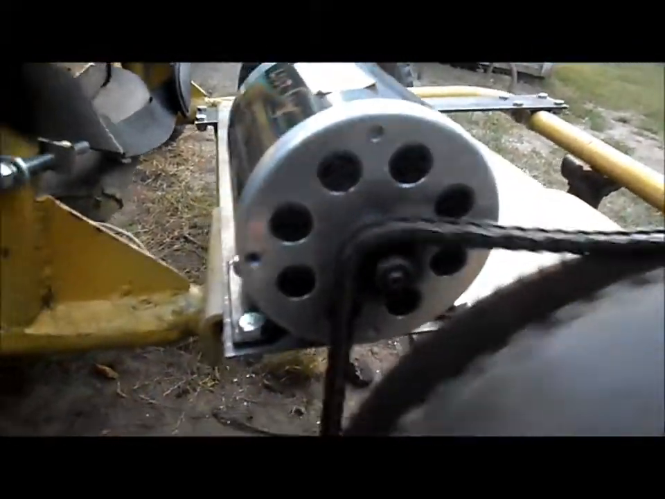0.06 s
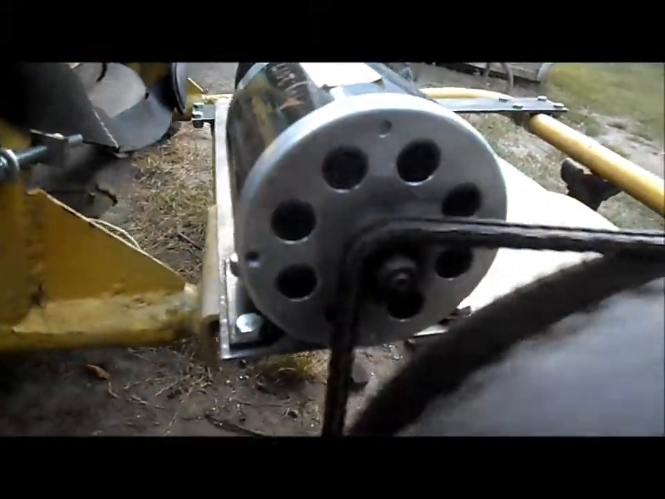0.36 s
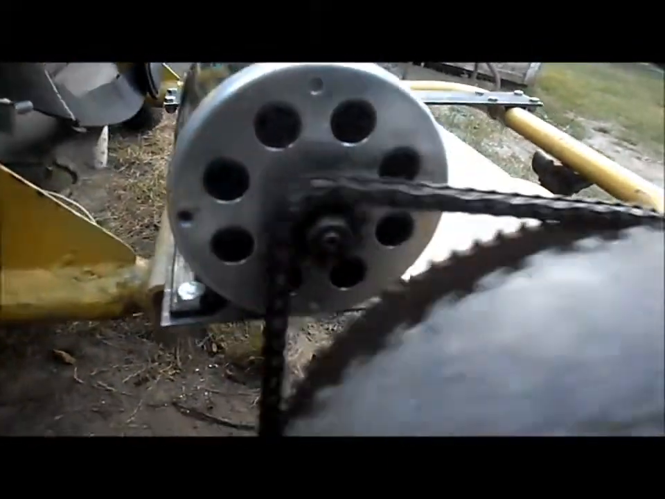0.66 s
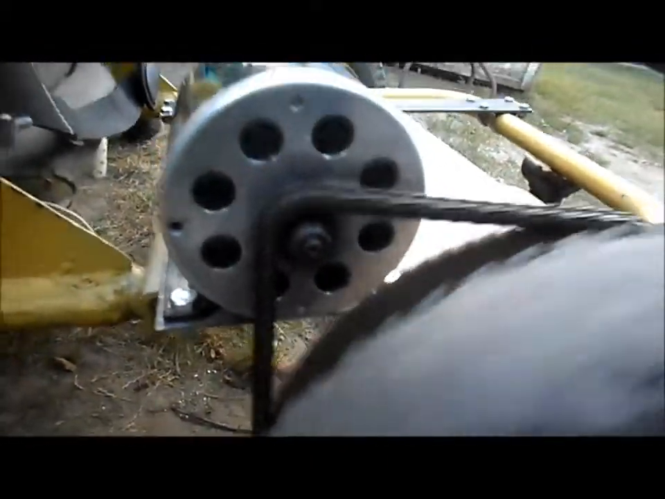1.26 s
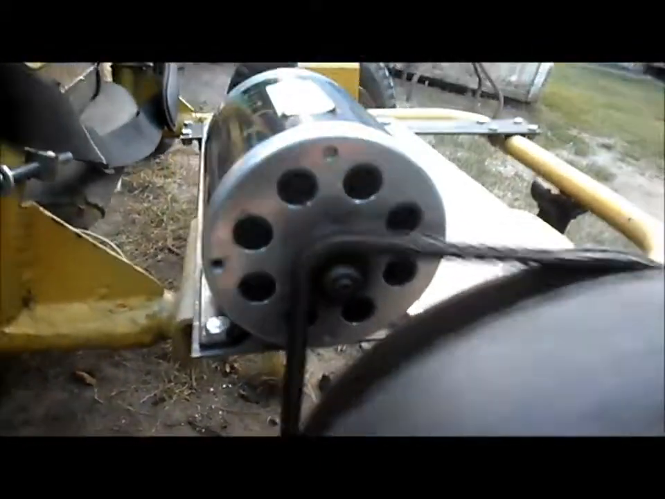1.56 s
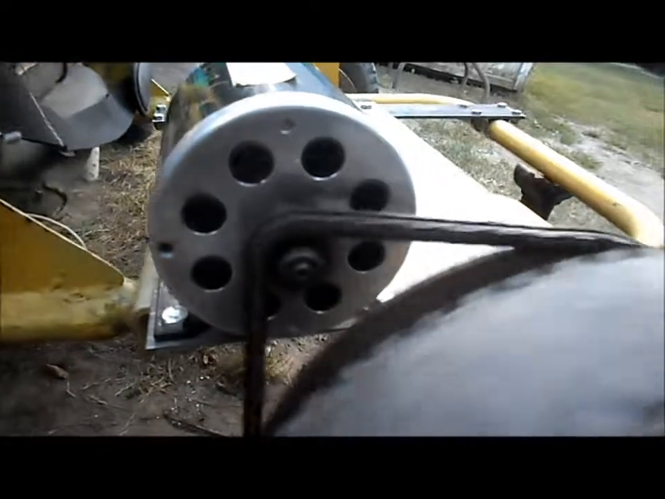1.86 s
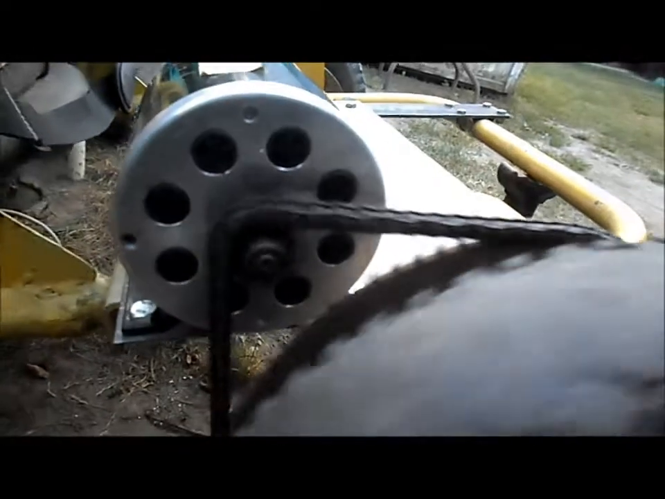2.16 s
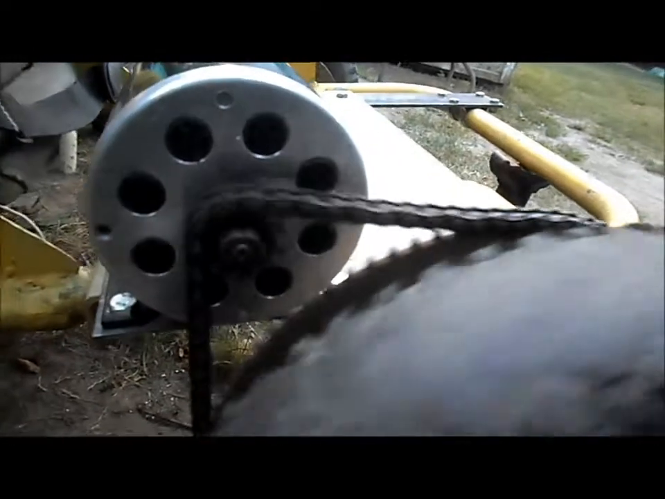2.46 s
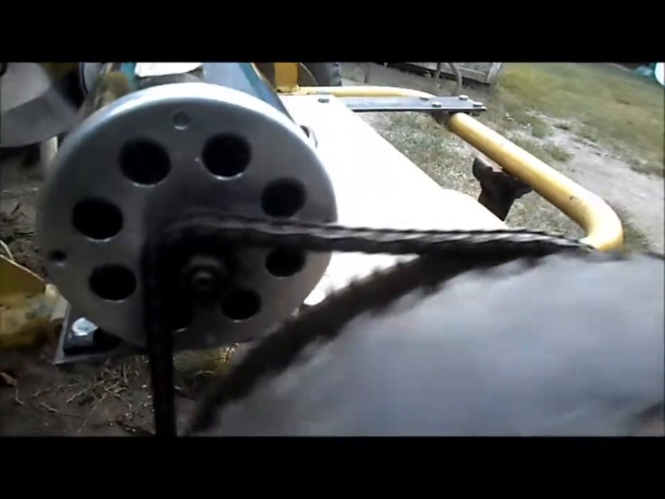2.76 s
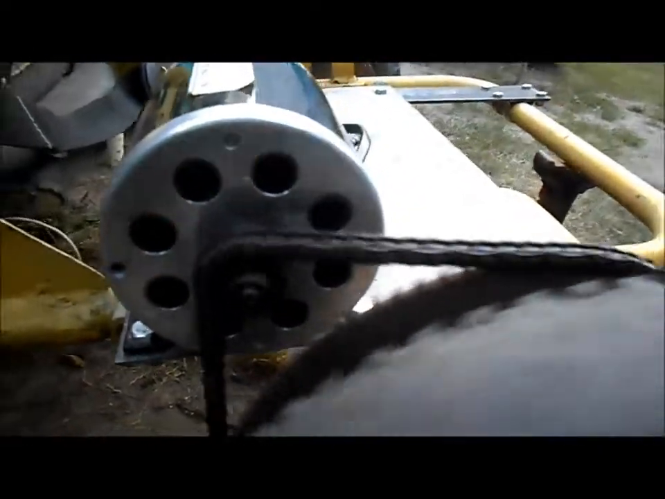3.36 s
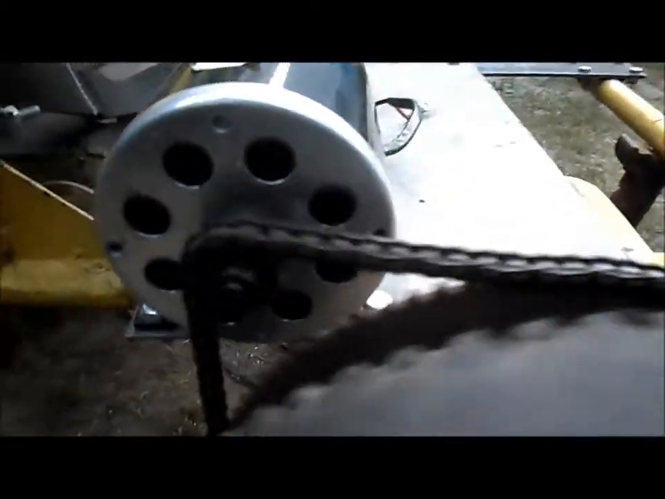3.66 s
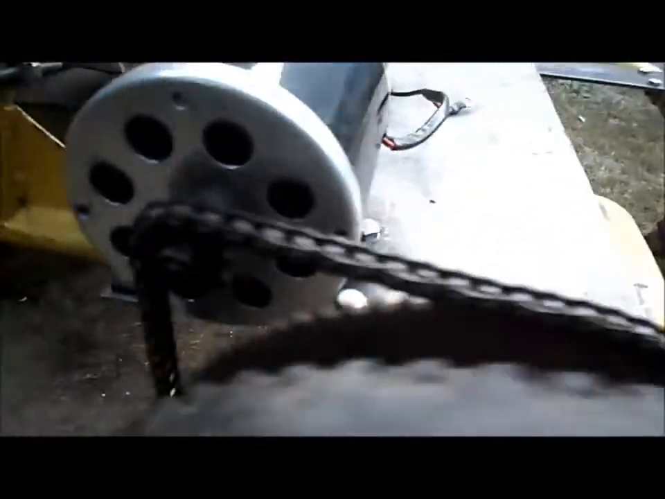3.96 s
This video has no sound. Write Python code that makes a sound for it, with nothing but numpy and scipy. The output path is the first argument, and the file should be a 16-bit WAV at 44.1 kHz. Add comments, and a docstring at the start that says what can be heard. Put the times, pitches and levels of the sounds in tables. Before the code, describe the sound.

A slack roller chain rattles and clacks over go-kart sprockets, close up, its steel ringing. It speeds up to peaks near 0.4, 2 and 3.3 seconds, coasting down after each. Brief squeaks come at 0.3 and 1.8 seconds, two dull knocks just before 1, and a short chassis groan at 2. Sprocket pings grow stronger from 2.5 seconds. A low drone follows the speed, over wind rumble.

```python
"""A slack roller chain runs over the sprockets of a go-kart, speeding up and coasting down three times.
Its links clack on the teeth, setting the steel and the large sprocket's plate ringing.
Underneath, the rollers rattle, the frame drones, the meshing teeth hum and wind rumbles on the microphone.
The chain squeaks twice, knocks twice and chatters near each top speed; the frame groans once."""
import sys
import numpy as np
from scipy import signal
from scipy.fft import rfft, irfft, next_fast_len
from scipy.io import wavfile

SR = 44100
rng = np.random.default_rng(int(sys.argv[2]) if len(sys.argv) > 2 else 0)


def dump_mix(stems):
    """Bounce the given channels to the path in sys.argv[1] as a 16-bit WAV at rate SR."""
    frames = np.atleast_2d(stems).T  # one column per channel
    limited = np.clip(frames, -1, 1)  # hard clip at full scale
    pcm = np.round(limited * 32767).astype(np.int16)
    wavfile.write(sys.argv[1], SR, pcm)


N = 176400

# pace of the chain: (t/s, rate/(links per second))
CHAIN_SPEED = [(0, 62), (.35, 87), (.55, 82.6), (.8, 56), (1.05, 39), (1.3, 33.5), (1.45, 41), (1.62, 87),
               (2.0, 96), (2.32, 70), (2.85, 45.5), (3.05, 79.6), (3.27, 95), (3.62, 66), (4, 52.6)]
# fader of the rollers' fine rattle: (t/s, level/dB)
RATTLE_LEVEL = [(0, -50), (.07, -43.5), (.6, -46.5), (.8, -51.5), (1.45, -57.5), (1.66, -44), (1.8, -40),
                (2.0, -42), (2.25, -53), (2.95, -51.5), (3.17, -48), (3.35, -46.5), (3.7, -53.5),
                (4, -48.5)]
# EQ of that rattle: (f/Hz, level/dB)
RATTLE_EQ = [(700, -12.5), (1450, -0.5), (2000, 7), (3200, 0), (5000, 1.5), (6200, -18), (7800, -5),
             (10500, -4)]
# short-ringing modes of the chain's steel: (f/Hz, width/Hz, level/dB)
STEEL_MODES = [(1299, 68, -2), (2070, 200, -3), (2707, 94, -6.5), (2964, 79, -5.5), (3520, 240, -14),
               (3920, 78, 1), (6290, 580, -6), (7530, 310, -10.5), (8680, 840, -6), (9390, 120, -2.5),
               (10030, 143, -7.5)]
# fader of the frame's drone: (t/s, level/dB)
DRONE_LEVEL = [(0, -49.5), (.3, -44), (.74, -42), (1.05, -53), (1.42, -60.5), (1.72, -39), (1.82, -44),
               (2.02, -32), (2.12, -37.5), (2.35, -46.5), (2.6, -54.5), (2.98, -52), (3.22, -32.5),
               (3.45, -44), (4, -52.5)]
# resonances of the frame: (f/Hz, width/Hz, level/dB)
FRAME_MODES = [(272.6, 13, 10), (353.6, 25.6, 1), (402, 74, -3.5), (528.4, 42, -0.5), (586, 35, 1),
               (686, 70, 0.5), (855, 130, -4.5), (1075, 300, -10), (1280, 60, -6.5), (1850, 270, -6.5)]
# EQ of the drive's low rumble: (f/Hz, level/dB)
RUMBLE_EQ = [(75, -10.5), (98, 1.5), (117, 4.5), (140, -6), (165, 1), (200, 1), (260, -8.5), (600, -31)]
# EQ of the wind on the microphone: (f/Hz, level/dB)
WIND_EQ = [(29, -2.5), (115, 0), (200, -18), (1000, -26.5), (10000, -49)]
# accents, where a link lands hard on a tooth: (t/s, level/dB)
HARD_HITS = [(0.038, -15), (0.057, -12), (0.0721, -13), (0.0884, -15), (0.1017, -12.5), (0.1289, -11),
             (0.1538, -15), (0.1813, -14.5), (0.1923, -15), (0.2031, -11.5), (0.2474, -18.5), (0.316, -15),
             (0.3478, -12), (0.396, -16.5), (0.434, -13), (0.4435, -16.5), (0.4557, -11.5), (0.4803, -12),
             (0.5044, -18), (0.518, -15.5), (0.5302, -12), (0.5437, -11.5), (0.555, -10), (0.5702, -17),
             (0.5825, -13.5), (0.6105, -13), (0.626, -15.5), (0.6398, -16), (0.655, -15), (0.669, -10.5),
             (0.6839, -13), (0.6989, -20), (0.715, -18.5), (0.731, -18.5), (0.7492, -19), (0.764, -15.5),
             (0.7815, -13.5), (0.8006, -12), (0.8358, -20), (0.8556, -16), (0.8749, -12.5), (0.8945, -15.5),
             (0.9155, -12), (0.94, -15.5), (0.9592, -15), (0.9863, -19.5), (1.0068, -20.5), (1.034, -23.5),
             (1.0576, -22.5), (1.0863, -19), (1.1111, -17), (1.1432, -20.5), (1.1712, -18), (1.2081, -17),
             (1.2393, -16), (1.3132, -16.1), (1.3544, -24), (1.377, -19), (1.4067, -24.5), (1.4298, -27),
             (1.4564, -16.5), (1.474, -13), (1.4971, -16), (1.511, -15), (1.572, -18.5), (1.5872, -21.5),
             (1.5984, -11.5), (1.6228, -19), (1.6442, -17.5), (1.6867, -21), (1.6978, -16.5), (1.7073, -15),
             (1.7254, -17), (1.7422, -13.5), (1.7786, -22), (1.7986, -15), (1.807, -15.5), (1.8179, -16),
             (1.8236, -13), (1.8365, -19), (1.872, -10.5), (1.882, -17), (1.8937, -8.5), (1.901, -16),
             (1.921, -17), (1.932, -15), (1.9528, -10.5), (1.9728, -10.5), (1.982, -14), (1.9934, -9),
             (2.0032, -14), (2.0129, -9), (2.0243, -12), (2.0345, -8.3), (2.047, -12), (2.0568, -11),
             (2.0784, -7.5), (2.09, -13), (2.101, -13.5), (2.1128, -12.5), (2.1243, -12), (2.1361, -15),
             (2.1476, -7), (2.1607, -10.5), (2.173, -14.5), (2.196, -16), (2.21, -13.5), (2.2226, -10.5),
             (2.2356, -13.5), (2.2482, -10), (2.264, -6.5), (2.2742, -10), (2.3027, -9.5), (2.331, -15.5),
             (2.3468, -18.5), (2.3576, -11.5), (2.3767, -20), (2.3871, -9.5), (2.406, -16.5), (2.4162, -9),
             (2.4467, -11.5), (2.478, -12.5), (2.51, -15), (2.5309, -20.5), (2.5422, -12.5), (2.5653, -19),
             (2.5759, -17), (2.6071, -16.5), (2.6438, -15.5), (2.6784, -15), (2.7153, -13), (2.753, -12.5),
             (2.7963, -21.5), (2.832, -16.5), (2.8547, -19.5), (2.8749, -15.5), (2.9103, -18.5),
             (2.9427, -13), (3.005, -14), (3.0217, -15), (3.0343, -9.5), (3.0473, -18), (3.0603, -15.5),
             (3.072, -14), (3.0849, -15.5), (3.097, -16.5), (3.119, -16), (3.1313, -9), (3.1438, -13),
             (3.1537, -8), (3.1654, -9), (3.1759, -7.5), (3.1867, -11), (3.1976, -10.5), (3.2092, -18),
             (3.2186, -11.5), (3.2304, -16), (3.2392, -10), (3.251, -12), (3.2596, -9.5), (3.2718, -12.5),
             (3.2811, -9), (3.2935, -12), (3.3033, -9.5), (3.316, -13), (3.3263, -11.5), (3.3392, -17),
             (3.3489, -9.5), (3.3615, -15), (3.372, -12), (3.3847, -18), (3.3955, -11), (3.408, -12.9),
             (3.4196, -8.5), (3.4334, -11), (3.4448, -9.5), (3.457, -21), (3.4696, -17), (3.483, -15.5),
             (3.4965, -10.5), (3.5088, -11), (3.5221, -11.5), (3.5379, -10), (3.548, -8.5), (3.5766, -11.5),
             (3.6318, -13.5), (3.6521, -20), (3.6608, -11.5), (3.6811, -24), (3.69, -9), (3.738, -18.5),
             (3.752, -16), (3.7692, -21.9), (3.784, -15), (3.8174, -17.5), (3.8475, -15.5), (3.8828, -18.5),
             (3.9163, -23.5), (3.95, -14), (3.9866, -18.5)]
# EQ of a clack's attack: (f/Hz, level/dB)
TICK_EQ = [(1500, -17.5), (2300, -14.5), (3400, -1.5), (5300, 1.2), (5900, 4), (6200, 10.5), (6600, 3.5),
           (7200, -1), (10300, -5)]
# long, clear modes of the sprockets: (f/Hz, level/dB)
CHIME_MODES = [(1665, -1.5), (1741, -4), (2008, -3), (2735, -5), (3933, -7), (7381, -10.5), (9226, -2)]
# send from the hits to the large sprocket's plate: (t/s, level/dB)
PLATE_SEND = [(.5, 2), (1.4, 4.5), (2.3, 4.5), (2.55, 15.5), (3.35, 7.5), (3.6, 14), (4, 21.5)]
# two close modes of that plate: (f/Hz, width/Hz, level/dB)
PLATE_MODES = [(2310, 31, 3.5), (2414, 27, 4)]
# crests of the chain's squeaks: (t/s, level/dB)
SQUEAK_PEAKS = [(.333, -43), (1.762, -42)]
# crests of the links' chatter: (t/s, level/dB)
CHATTER_PEAKS = [(.56, -43), (1.96, -44), (3.21, -46)]
# dull knocks of the slack chain: (t/s, level/dB)
SLACK_KNOCKS = [(.728, -27.5), (.946, -30.5)]
# fader of the frame's groan: (t/s, level/dB)
GROAN_LEVEL = [(1.86, -46), (1.98, -39.5), (2.04, -33), (2.075, -73)]


def from_db(db):
    """Decibels to gain."""
    return 10 ** (np.asarray(db) / 20)


def rms_one(x):
    """Scale to unit rms."""
    return x / np.sqrt(np.mean(x ** 2) + 1e-20)


def automation(rows):
    """Straight ramps through (t/s, value) points, at every sample."""
    return np.interp(np.arange(N) / SR, *np.transpose(rows))


def swells(peaks, fade_s):
    """A bell-shaped envelope around each (t/s, level/dB), down to 1/e at fade_s either side."""
    t = np.arange(N) / SR
    return sum(from_db(db) * np.exp(-((t - s) / fade_s) ** 2) for s, db in peaks)


def equalise(x, points):
    """Minimum-phase EQ through (f/Hz, level/dB) points: nothing rings ahead of an attack."""
    size = 2 * next_fast_len(N)
    hz, db = np.transpose(points)
    grid_hz = np.maximum(np.arange(size // 2 + 1) * SR / size, 1)
    gain = from_db(np.interp(np.log(grid_hz), np.log(hz), db))
    cepstrum = irfft(np.log(gain))
    cepstrum[1:size // 2] *= 2
    cepstrum[size // 2 + 1:] = 0
    return irfft(rfft(x, size) * np.exp(rfft(cepstrum)))[:N]


def resonate(x, hz, width_hz):
    """One resonance, unity gain at its peak."""
    r = np.exp(-np.pi * width_hz / SR)
    feedback = [1, -2 * r * np.cos(2 * np.pi * hz / SR), r * r]
    return signal.lfilter(np.array([1, 0, -1]) * (1 - r * r) / 2, feedback, x + 1e-18)


def band(x, hz, width_hz):
    """The same resonance twice in series, for steeper skirts."""
    return resonate(resonate(x, hz, width_hz), hz, width_hz)


def body(x, modes):
    """Parallel resonances with alternating polarity."""
    return sum((-1) ** k * from_db(db) * resonate(x, hz, width)
               for k, (hz, width, db) in enumerate(modes))


def scatter(hits, t60_s):
    """Every hit becomes a dying burst of noise of the same energy."""
    decay = from_db(-60 / (t60_s * SR)) ** 2
    energy = signal.lfilter([1 - decay], [1, -decay], hits ** 2 + 1e-18)
    return np.sqrt(energy) * rng.standard_normal(N)


def roller_grains(per_link=40, spread_db=5.5):
    """Tiny contacts of rollers and pins, denser as the chain speeds up."""
    contacts = rng.random(N) < per_link * automation(CHAIN_SPEED) / SR
    polarity = rng.choice([-1, 1], N)
    strength = from_db(spread_db * np.minimum(rng.exponential(1, N), 4))
    return contacts * polarity * strength


def roller_rattle(grains):
    """The rollers' contacts make a fine grit, partly ringing in the steel."""
    grit = from_db(0.5) * rms_one(equalise(grains, RATTLE_EQ))
    ring = from_db(-2) * rms_one(body(grains, STEEL_MODES))
    return from_db(automation(RATTLE_LEVEL)) * (grit + ring)


def follow_drone(mean_db, depth):
    """A gain that rides the drone's fader: depth times its swing in dB, around mean_db."""
    drone_db = automation(DRONE_LEVEL)
    return from_db(mean_db + depth * (drone_db - drone_db.mean()))


def frame_drone(trim_db=-1):
    """The running drive shakes the frame: a drone in its resonances over a low rumble."""
    drone = rms_one(body(rng.standard_normal(N), FRAME_MODES))
    drone *= from_db(automation(DRONE_LEVEL) + trim_db)
    rumble = rms_one(equalise(rng.standard_normal(N), RUMBLE_EQ))
    return drone + follow_drone(mean_db=-41, depth=0.58) * rumble


def mesh_hum(waver_depth=0.0118):
    """Meshing teeth hum on harmonics of the link rate; each swells as it crosses a frame resonance."""
    waver = signal.resample(rng.standard_normal(160), N)
    link_hz = automation(CHAIN_SPEED) * (1 + waver_depth * waver)
    phase = 2 * np.pi * np.cumsum(link_hz) / SR
    harmonics = sum(np.sin(k * phase + rng.uniform(0, 2 * np.pi)) for k in range(2, 8))
    hum = body(harmonics, FRAME_MODES) + 0.5 * np.sin(2 * phase)
    return follow_drone(mean_db=-54.5, depth=1.3) * rms_one(hum)


def wind(level_db=-40, low_cut_hz=18):
    """Wind buffets the microphone: a bed of lumpy low noise."""
    air = equalise(rng.standard_normal(N), WIND_EQ)
    low_cut = signal.butter(2, low_cut_hz, "high", fs=SR, output="sos")
    return from_db(level_db) * rms_one(signal.sosfilt(low_cut, air))


def link_hits(soft_db=-28.5, spread_db=4, jitter_links=0.063):
    """Links land on teeth: hard accents, with soft hits between them at the pace of the chain."""
    times, hard_db = np.transpose(HARD_HITS)
    hard_at = np.sort(np.clip((times * SR).astype(int), 0, N - 1))
    speed = automation(CHAIN_SPEED)
    links_passed = np.cumsum(speed) / SR
    hits = np.zeros(N)
    for start, end in zip(links_passed[hard_at], links_passed[hard_at[1:]]):
        steps = max(int(round(end - start)), 1)
        links = np.linspace(start, end, steps + 1)[1:-1]
        timing, force = rng.standard_normal((2, 20))[:, :len(links)]
        soft_at = np.searchsorted(links_passed, links + jitter_links * timing)
        hits[np.minimum(soft_at, N - 1)] = from_db(soft_db + spread_db * force)
    hits *= (speed / speed.mean()) ** 1.5  # only the soft hits grow with speed
    hits[hard_at] = from_db(hard_db)
    return hits


def clacks(hits, variation=0.38, chime_q=210):
    """Each hit is a hard tick, never quite the same, a short ring of steel and a faint sprocket chime."""
    tick = equalise(hits + variation * scatter(hits, t60_s=0.009), TICK_EQ)
    shake = scatter(hits, t60_s=0.047)
    ring = body(shake, STEEL_MODES)
    chime = body(shake, [(hz, hz / chime_q, db) for hz, db in CHIME_MODES])
    return from_db(9) * tick + from_db(11.5) * ring + from_db(19.5) * chime


def plate_ping(hits, delay_s=0.002696, hz=2402, width_hz=213):
    """Each hit reaches the large sprocket a moment later: its plate pings, and two close modes beat."""
    send = hits * from_db(automation(PLATE_SEND))
    samples = np.arange(N)
    delayed = np.interp(samples - delay_s * SR, samples, send, left=0)
    shake = resonate(delayed, hz, width_hz)
    ping = resonate(shake, hz, width_hz)
    tail = sum(from_db(db) * resonate(shake, mode_hz, width) for mode_hz, width, db in PLATE_MODES)
    return ping + tail


def squeaks():
    """Steel rubs on steel: brief, bright chirps in one narrow resonance."""
    rub = band(rng.standard_normal(N), hz=4720, width_hz=240)
    return swells(SQUEAK_PEAKS, fade_s=0.009) * rms_one(rub)


def link_chatter(grains):
    """The links chatter in a broad midrange swell near each top speed."""
    mids = band(grains, hz=1965, width_hz=1700)
    return swells(CHATTER_PEAKS, fade_s=0.13) * rms_one(mids)


def slack_knocks():
    """The slack chain knocks dully: a couple of cycles of a heavily damped resonance."""
    pushes = np.zeros(N)
    for s, db in SLACK_KNOCKS:
        pushes[int(s * SR)] = from_db(db)
    thuds = band(pushes, hz=700, width_hz=540)
    return thuds * pushes.max() / np.abs(thuds).max()


def frame_groan():
    """One resonance of the frame swells at top speed and stops as the pull ends."""
    tone = band(rng.standard_normal(N), hz=590, width_hz=55)
    compressed = tone / np.sqrt(np.abs(signal.hilbert(tone)) + 1e-12)  # 2:1, evens out the flutter
    t = np.arange(N) / SR
    gate = (t > GROAN_LEVEL[0][0]) & (t < GROAN_LEVEL[-1][0])
    return from_db(automation(GROAN_LEVEL)) * gate * rms_one(compressed)


def scene():
    """Chain, sprockets, frame and wind, mixed in mono at one close microphone."""
    hits = link_hits()
    impacts = clacks(hits) + plate_ping(hits)
    grains = roller_grains()
    texture = roller_rattle(grains) + squeaks() + link_chatter(grains)
    frame = frame_drone() + mesh_hum() + frame_groan()
    return (impacts + texture + frame + slack_knocks() + wind())[None]


def record(dry):
    """A steep high cut at 10.5 kHz takes the air off the mix."""
    high_cut = signal.firwin(91, 10500, window=("kaiser", 6), fs=SR)
    return signal.fftconvolve(dry, high_cut[None], "same", axes=1)


dry = scene()
out = record(dry)
dump_mix(out)
```